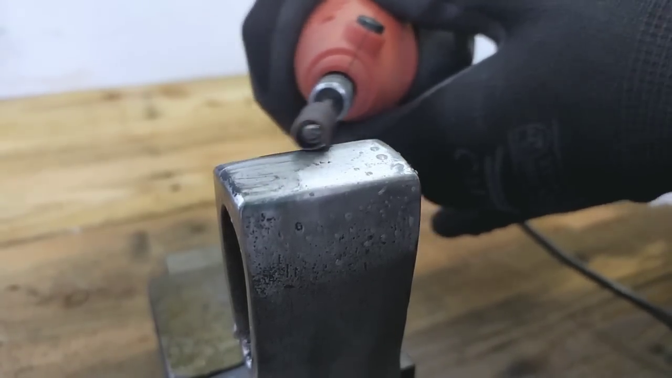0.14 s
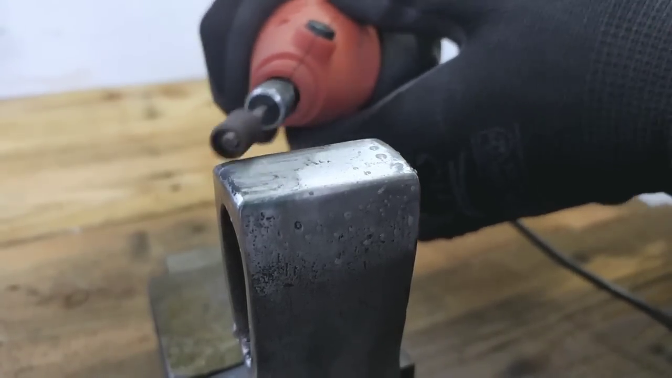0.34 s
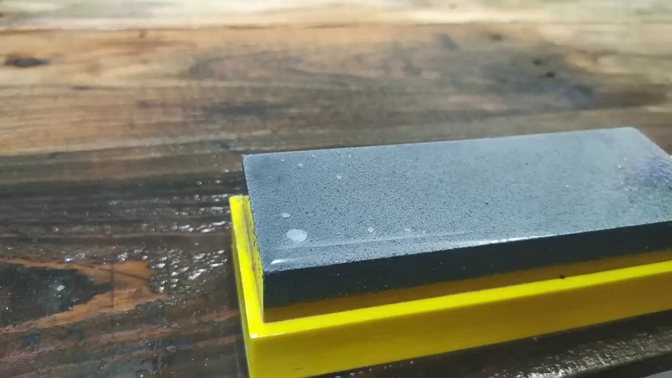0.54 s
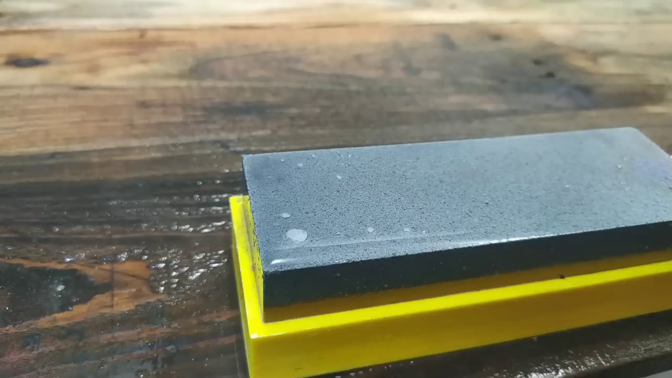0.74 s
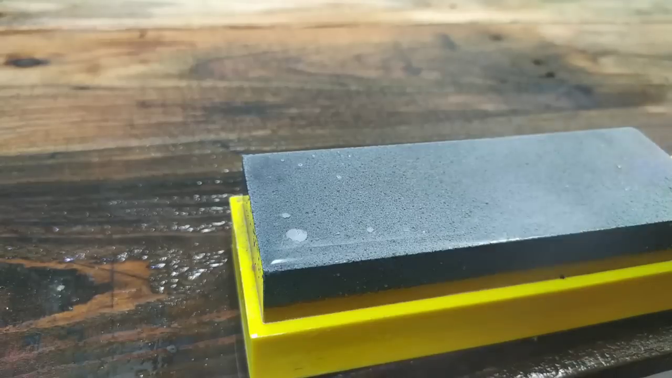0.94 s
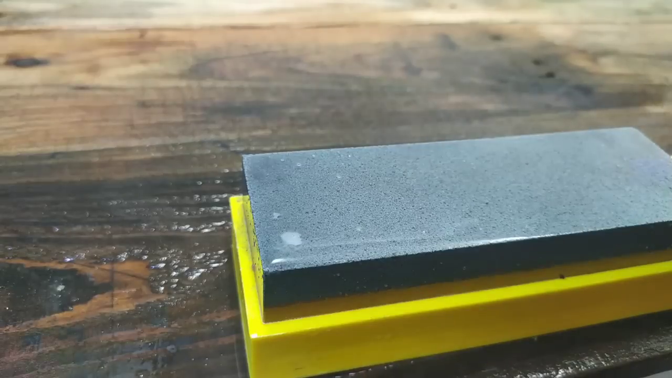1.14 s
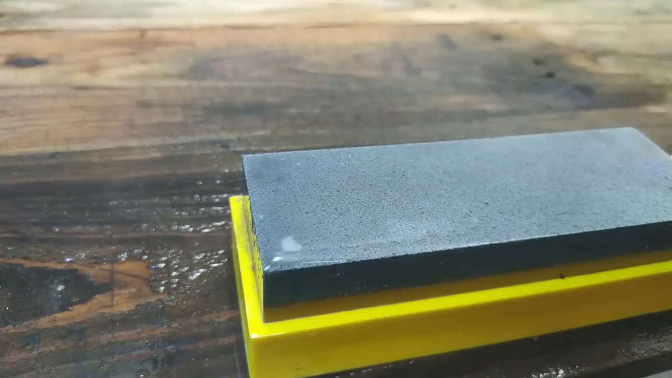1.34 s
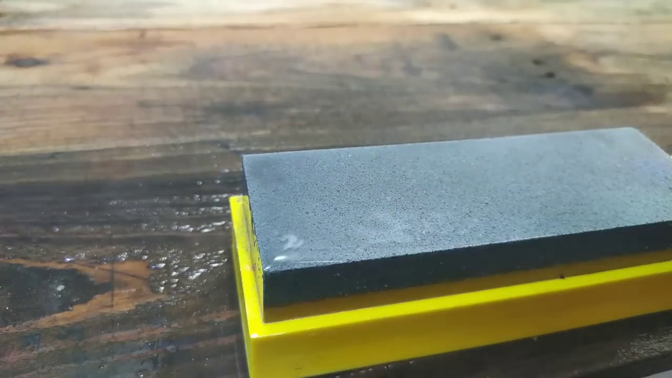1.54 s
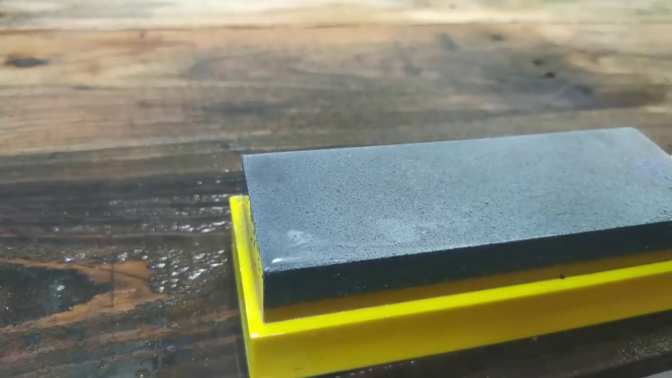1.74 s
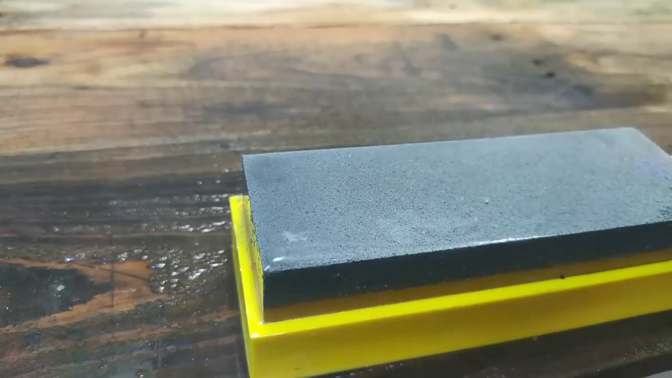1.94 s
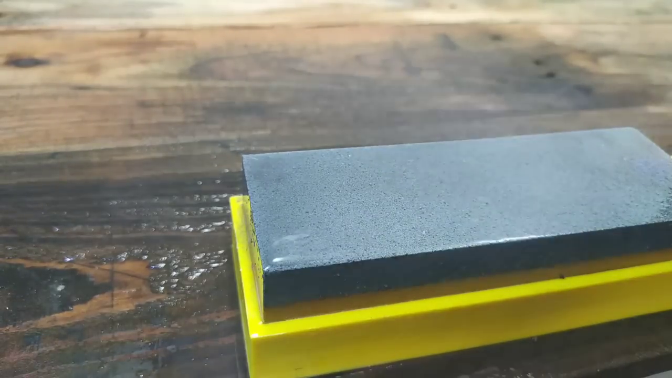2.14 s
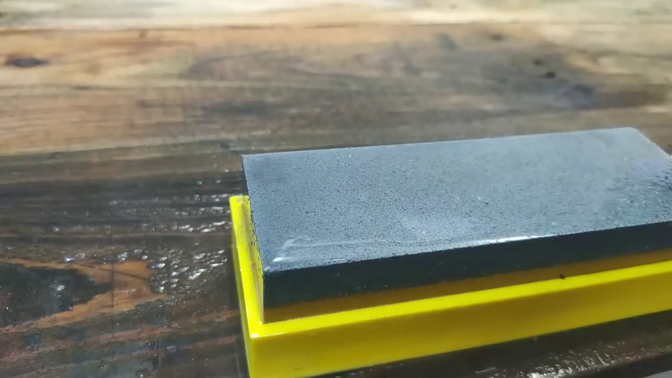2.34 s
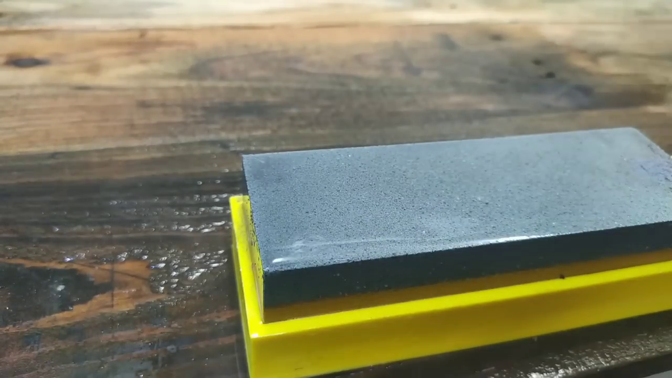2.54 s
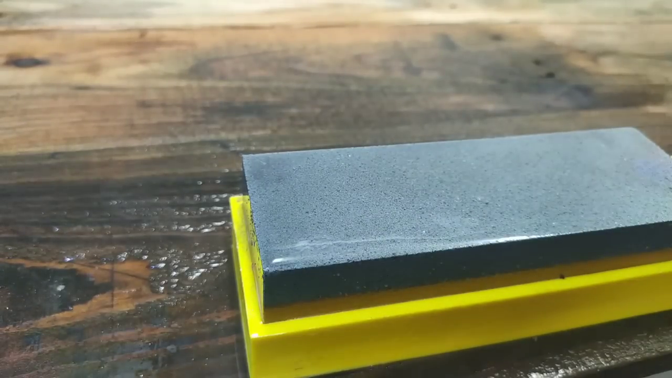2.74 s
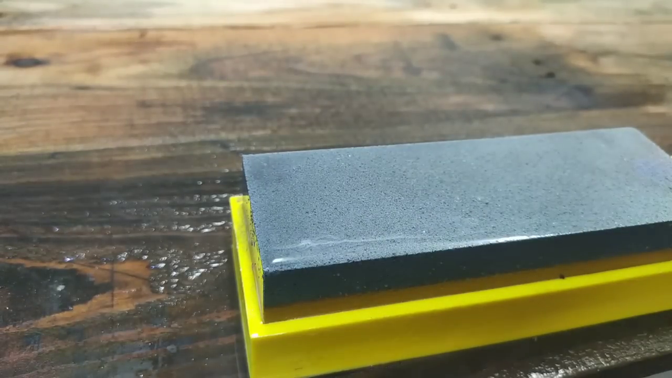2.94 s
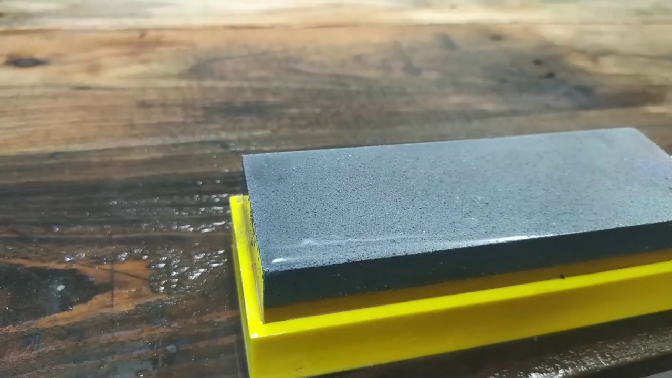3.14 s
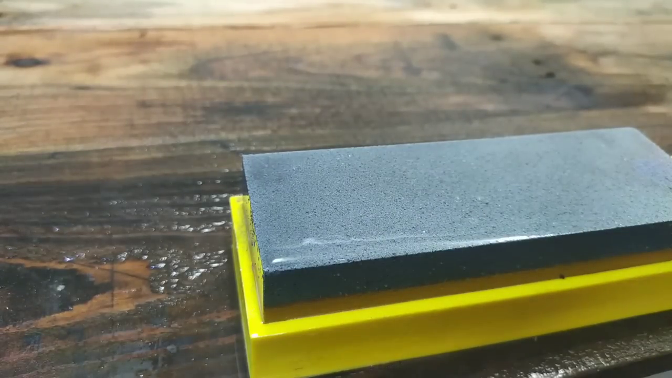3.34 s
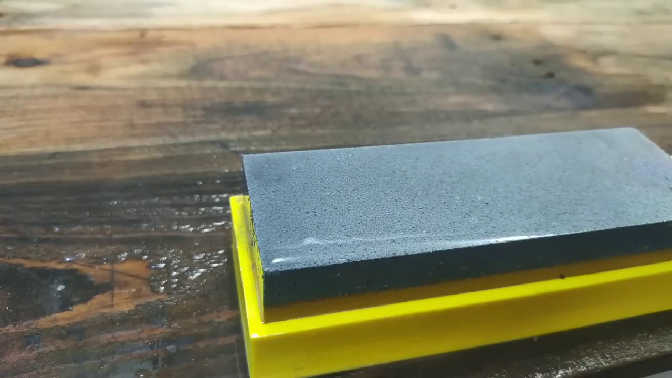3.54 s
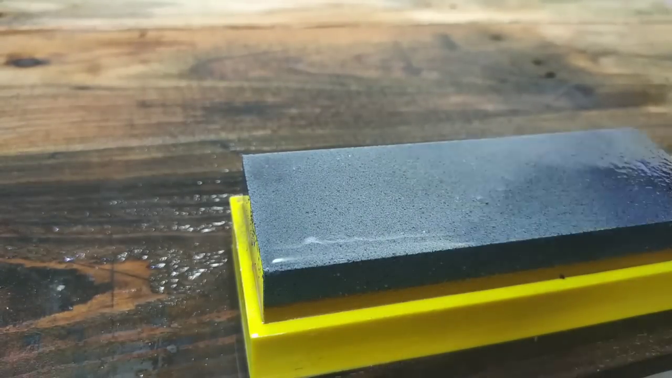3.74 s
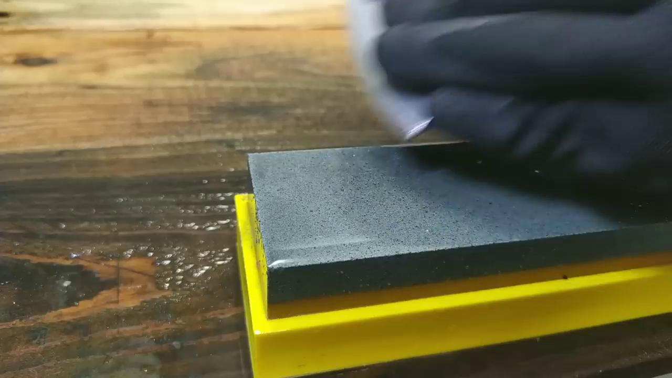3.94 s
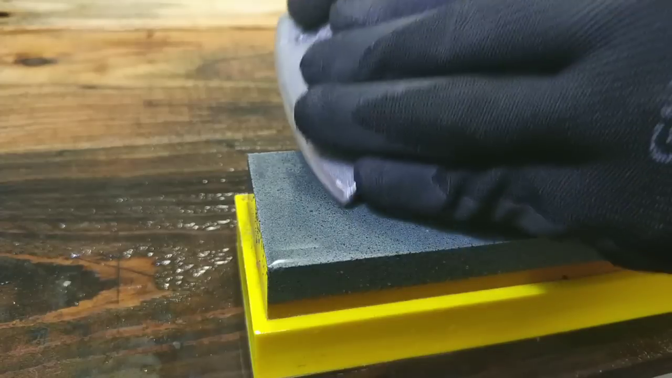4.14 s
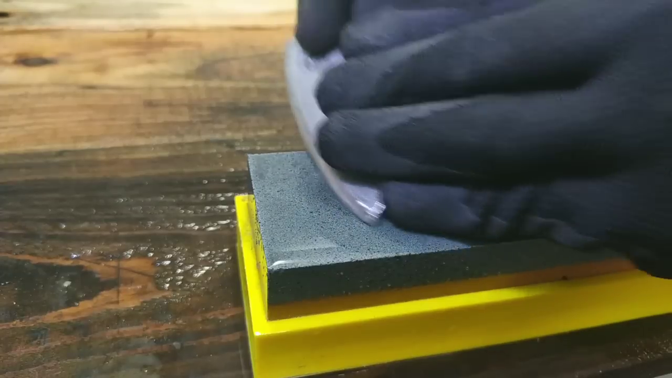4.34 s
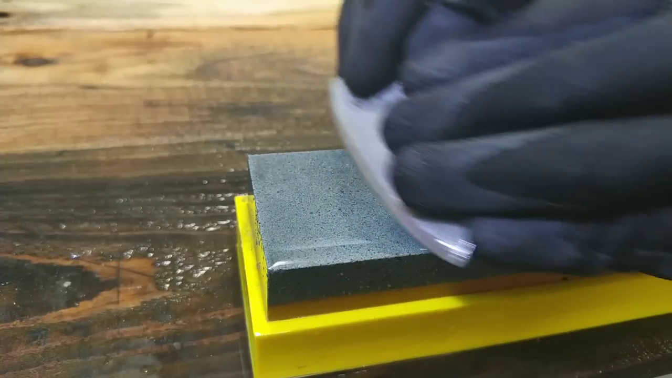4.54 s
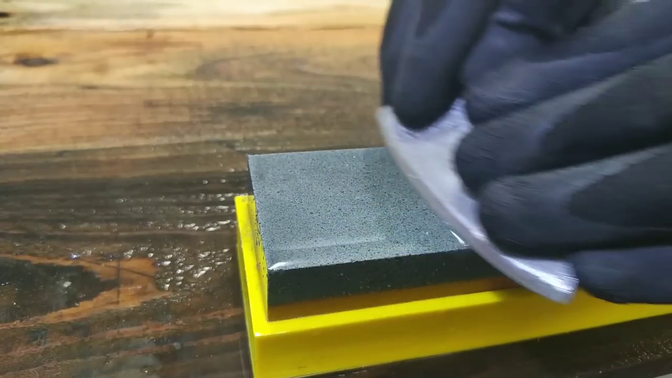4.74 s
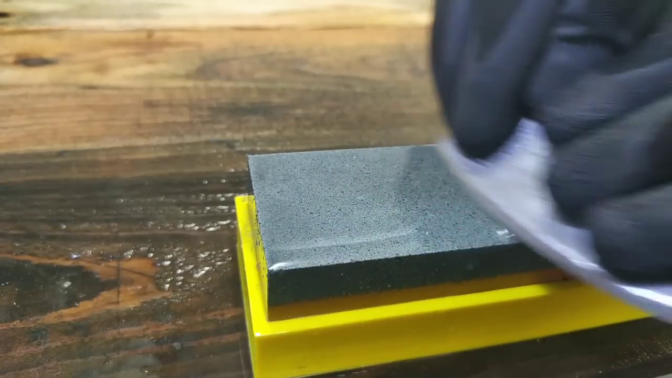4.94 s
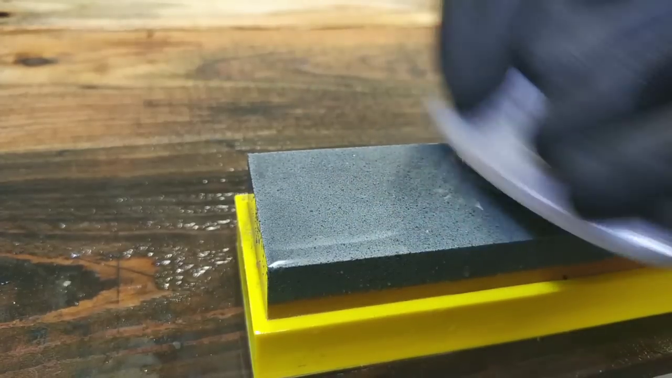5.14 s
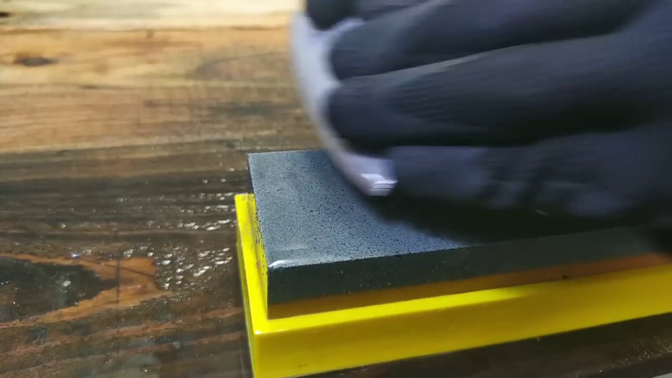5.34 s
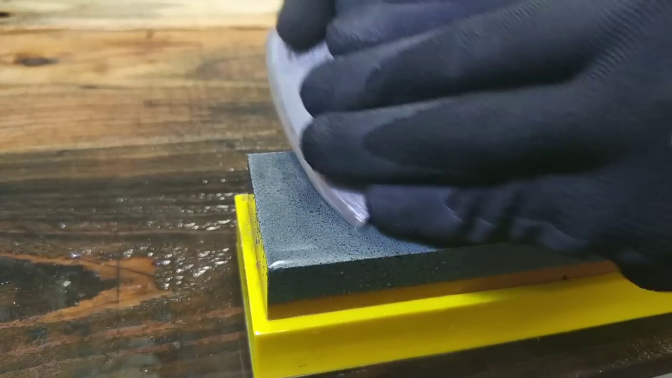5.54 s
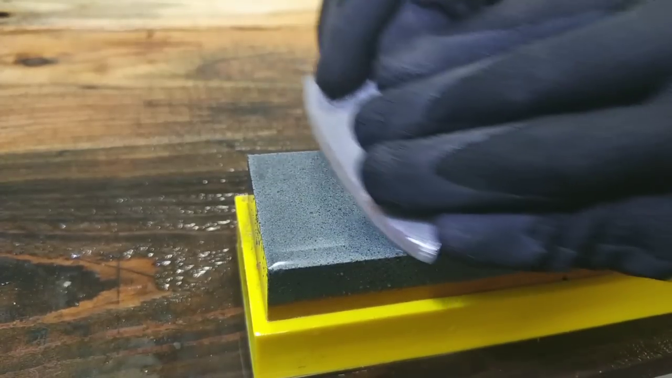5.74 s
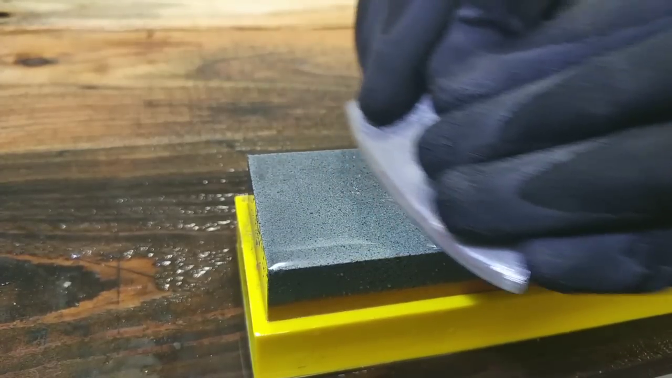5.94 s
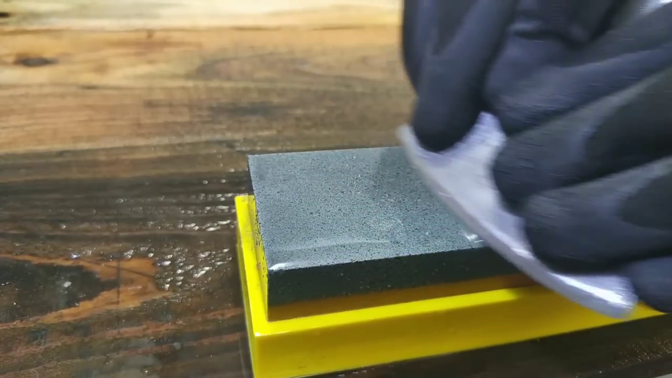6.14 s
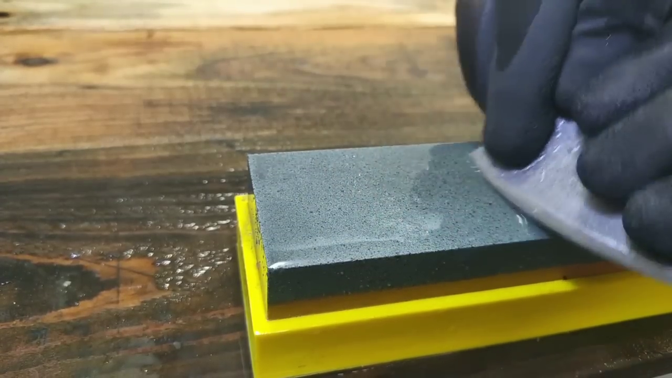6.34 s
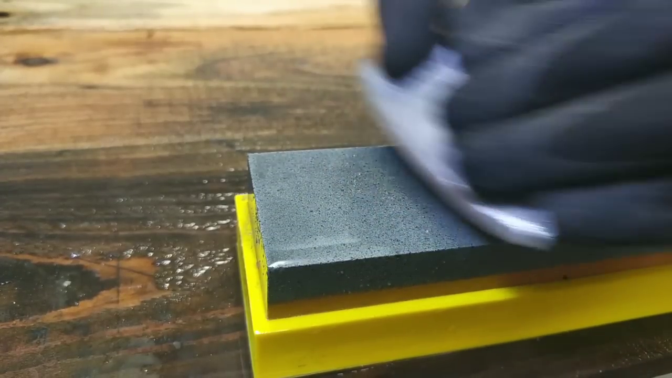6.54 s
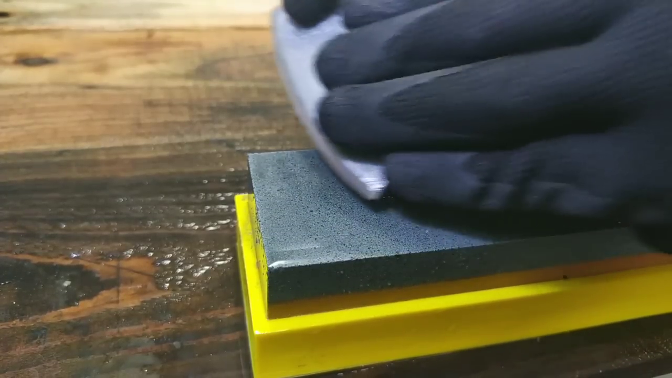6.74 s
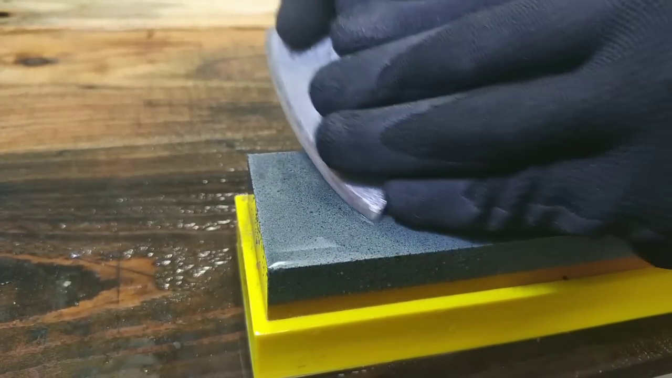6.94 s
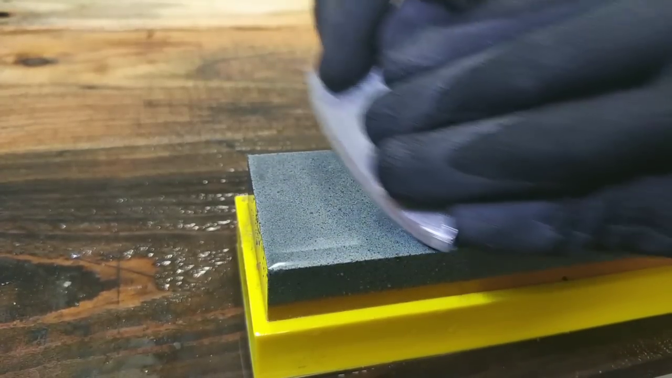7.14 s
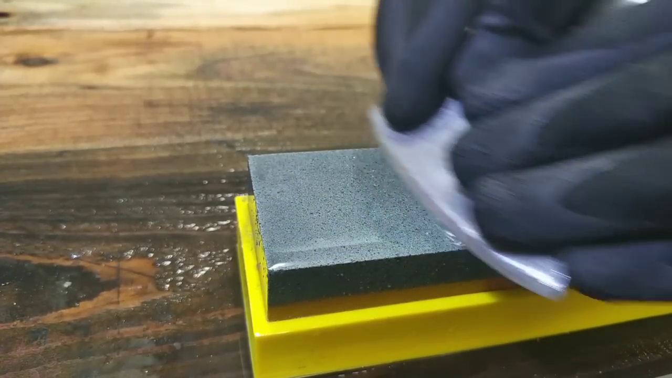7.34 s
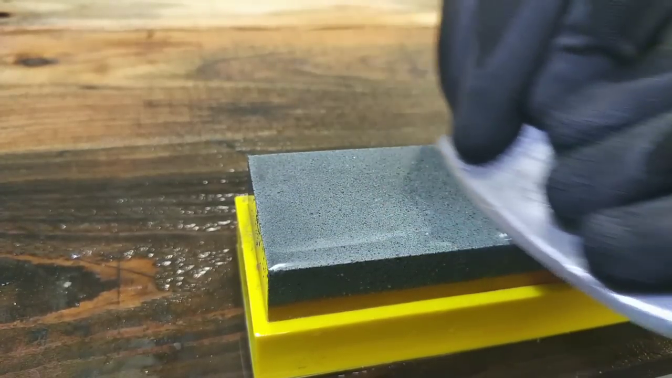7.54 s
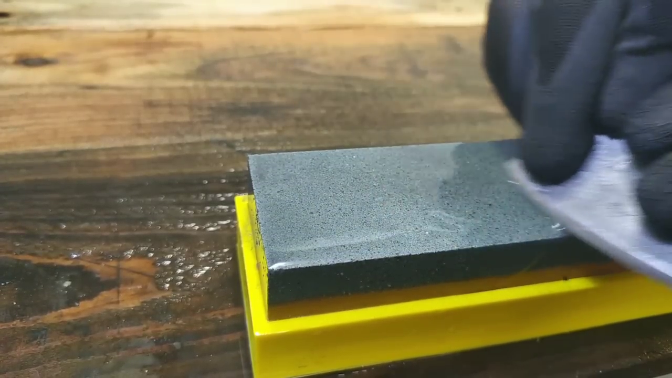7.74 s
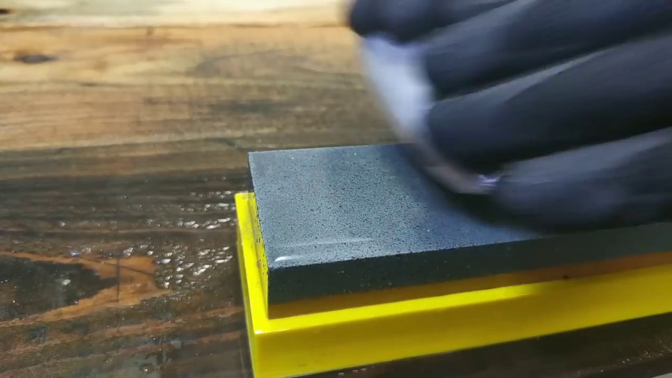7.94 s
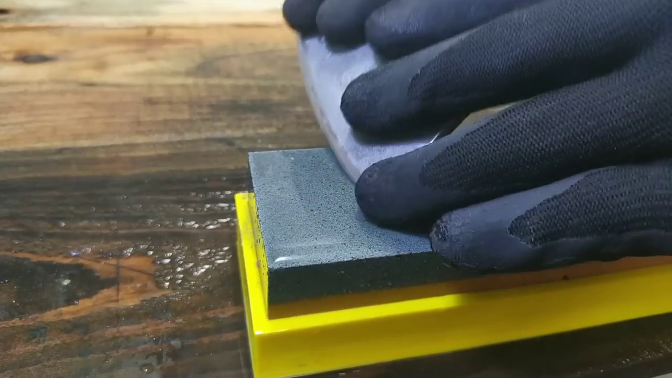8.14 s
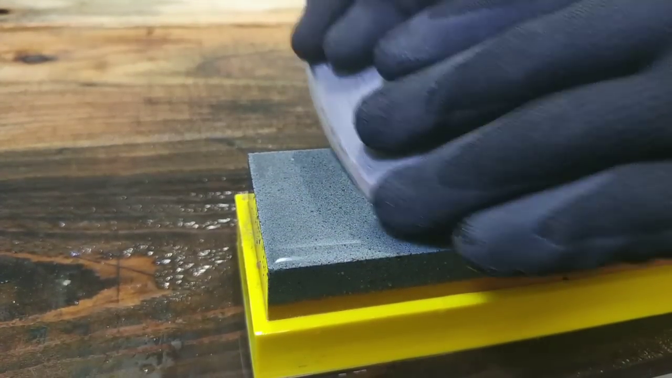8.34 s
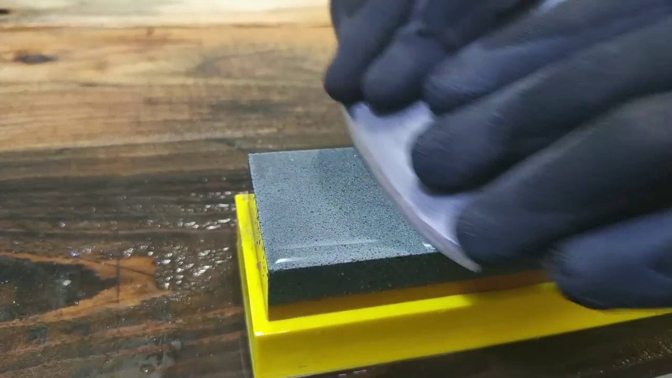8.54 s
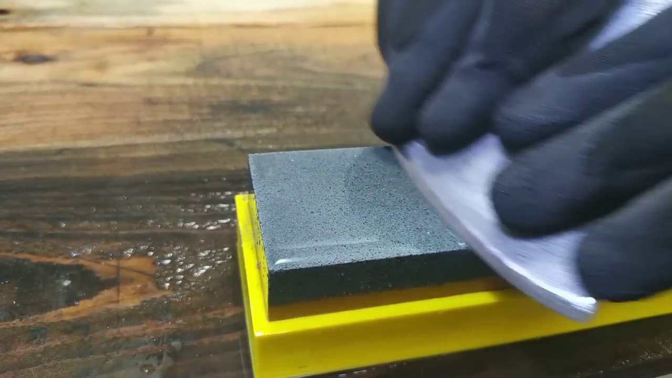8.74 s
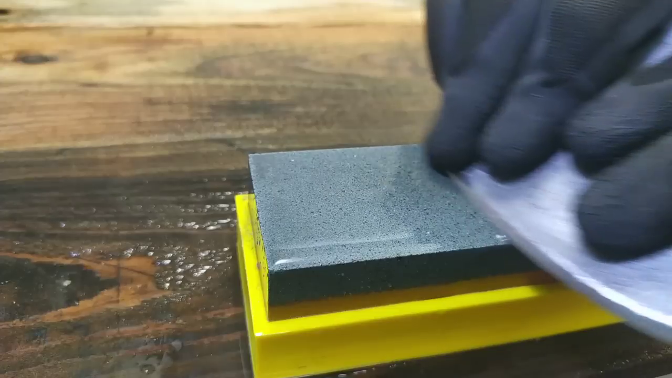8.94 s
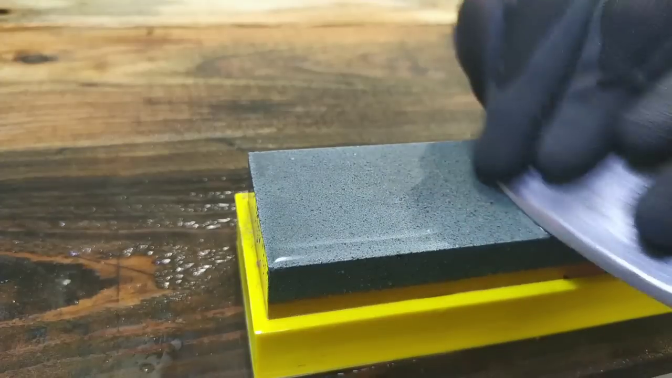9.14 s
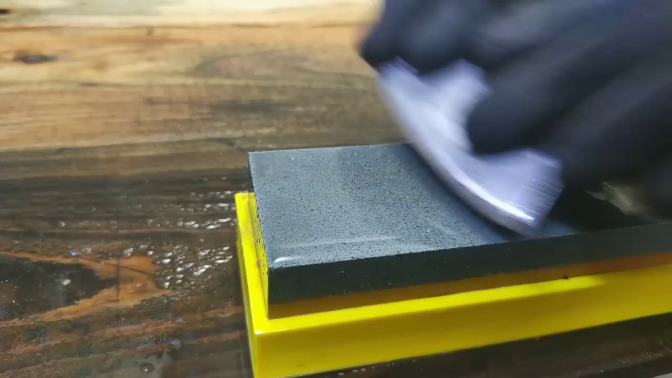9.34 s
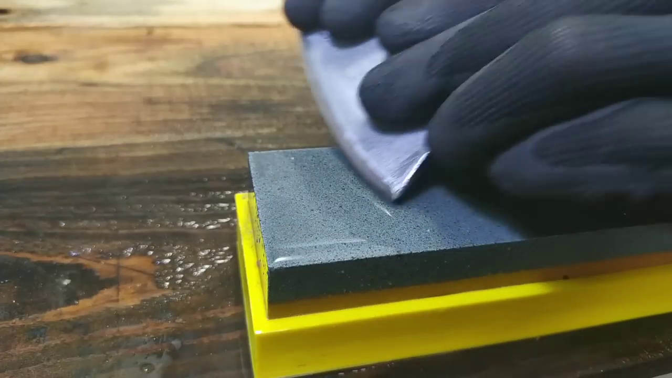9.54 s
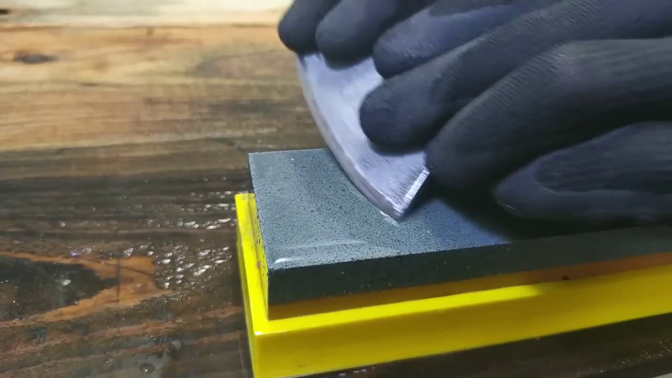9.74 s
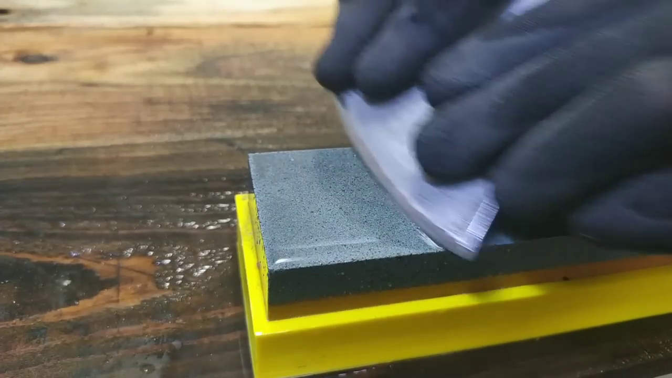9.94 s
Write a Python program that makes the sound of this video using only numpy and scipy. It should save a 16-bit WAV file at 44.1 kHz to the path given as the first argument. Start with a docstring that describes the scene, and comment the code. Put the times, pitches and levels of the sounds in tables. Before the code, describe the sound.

Close microphone, short room reverberation, soft background rumble. First a loud electric grinder buzzes against metal, sagging slightly in pitch, then fades quickly. Six crackling squirts of water follow in quick rhythm, each a hissing jet with rapid spits and a hollow plastic thump. Near silence follows, then a short metallic clack and slow abrasive strokes of blade on wet stone, their thin metallic tones gliding, the last cut short.

```python
"""Workshop, over a steady rumble, hiss and faint whine of filtered noise.
A rotary tool grinds a steel axe head and fades: shaft orders plus pulsed noise, in wide stereo; the rest is mono.
A trigger bottle sprays a whetstone six times: noise jet, pairs of valve spits, bottle thumps; ticks from the fade on.
The axe edge then lands on or snags the stone, ringing head and bench, and is drawn along it five times:
noise through modes that glide with the point of contact."""
import sys
import numpy as np
from scipy import signal
from scipy.fft import rfft, irfft, next_fast_len
from scipy.io import wavfile
from scipy.ndimage import uniform_filter1d, map_coordinates

SR = 44100
rng = np.random.default_rng(int(sys.argv[2]) if len(sys.argv) > 2 else 0)


def digitize_waveform(pressure):
    """Quantize a signal to 16-bit integers and store it at the path in sys.argv[1].

    Rows of a 2-D input are taken as channels; values are limited to [-1, 1].
    """
    field = np.atleast_2d(pressure).T
    bounded = np.clip(field, -1, 1)
    quanta = np.round(bounded * 32767).astype(np.int16)
    wavfile.write(sys.argv[1], SR, quanta)


N = 440118
T = np.arange(N) / SR
TOP_HZ = 15600

# background: (time [s], rumble [dB], hiss [dB])
ROOM_LEVELS = [(0, -56, -60), (.7, -59.5, -56.5), (.9, -58.5, -64.5), (2.4, -57.5, -63), (4.05, -58, -64.5),
               (4.11, -62, -66), (4.16, -59, -61), (9.98, -55.5, -66)]
# noise colours: (frequency [Hz], relative density [dB])
RUMBLE_SPECTRUM = [(15, -73.5), (25, -38.5), (39, -20.5), (52, -2), (69, 0.5), (125, -6), (161, -6.5),
                   (203, -9), (574, -15.5), (713, -17.5), (1120, -22), (1650, -41), (1970, -32.5),
                   (2700, -62), (3510, -84), (5940, -120)]
HISS_SPECTRUM = [(1590, -31.5), (2700, -27.5), (3560, -39.5), (3860, -4), (4340, -45), (5060, -10),
                 (5530, -7), (7460, 1.5), (8200, -1), (9020, -29), (13400, -33), (15500, -44.5)]
# faint electric whine: (centre [Hz], width of one filter pass [Hz], level [dB])
FAINT_WHINE = [(1946, 45, -71.5), (2337, 51, -88.5), (5130, 58, -79)]

# grinding: (time [s], level [dB], treble gain [dB])
TOOL_LEVELS = [(0.0, -31.5, 4.5), (0.152, -33, 6), (0.354, -27.5, 8), (0.508, -35, 6), (0.562, -32, 8.5),
               (0.61, -34.5, 9), (0.696, -50.5, 6.5), (0.705, -56, -0.5)]
# shaft speed, sagging under load: (time [s], speed [turns/s])
SHAFT_SPEED = [(0, 257.6), (.18, 257.8), (.28, 254.8), (.42, 248.2), (.46, 249.5), (.58, 257.4),
               (.7, 258.6)]
# grinding noise colour: (frequency [Hz], relative density [dB])
GRIND_SPECTRUM = [(18, -38), (30, -22), (59, 2), (173, -17.5), (249, -11), (432, -22), (505, -17),
                  (591, -10), (747, -9.5), (1170, -11), (1290, -2.5), (2300, -1), (3590, -14), (6720, -2),
                  (15500, -22.5)]
# shaft order envelope: (frequency [Hz], relative level [dB])
ORDER_ENVELOPE = [(140, -42), (240, -18), (434, -15), (759, -16), (1150, 3), (1280, -6.5), (2280, -10.5),
                  (3580, -7.5), (6710, -1.5), (15500, -13.5)]
# prominent orders: (shaft order [-], gain over envelope [dB])
STRONG_ORDERS = [(3, 6.5), (4, -7), (6, 5), (8, 5.5), (9, 10), (26, 5), (28, 8), (30, 5), (33, 6),
                 (34, 0.5)]
# stereo image of the grinding noise: (frequency [Hz], left-right correlation [-])
STEREO_LIKENESS = [(60, 0.98), (180, 0.51), (550, 0.35), (1650, -0.45), (4970, 0.17), (15000, -0.13)]

# dry clicks: (time [s], peak [dB], centre [Hz], width of one filter pass [Hz], burst t60 [s])
TICKS = [(.7165, -34, 6860, 6000, 0.0074), (1.1323, -37, 1300, 1100, 0.0071),
         (1.2174, -36.5, 6500, 5800, .004), (1.2274, -37, 8000, 7000, 0.0055),
         (2.1083, -32, 7670, 7040, .005), (2.2665, -30, 7400, 8000, .01), (2.348, -36, 2480, 5000, 0.004),
         (2.419, -39, 4940, 14000, 0.005), (2.807, -38, 6850, 5000, 0.01), (3.5023, -33, 6800, 4400, 0.01),
         (3.552, -43.5, 7000, 4000, 0.007), (9.726, -36.5, 9000, 8000, .008),
         (9.877, -28.5, 7000, 5930, 0.0067)]
# thin rings after some ticks: (time [s], level [dB])
PINGS = [(2.42, -74), (2.807, -63.5), (3.502, -68)]
PING_HZ, PING_WIDTH_HZ, PING_T60_S = 9500, 140, 0.28  # width of one filter pass

# trigger pulls: (nominal first spit [s], nominal last spit [s], spits [-], slow start [ms], slow ends [ms],
#   relative spit level [dB], relative fore-spit level [dB], nominal fore-spit lead [ms],
#   relative bottle thump [dB], jet opens [s], opening time [s], leak before [dB], jet at start [dB],
#   jet under spits [dB], shutting time [s], mist after [dB])
TRIGGER_PULLS = [(1.0432, 1.0646, 5, 0, 0, -10.5, -2, 2.5, -28.5, 1.021, .02, -60, -33, -28, .03, -60),
                 (1.2495, 1.3092, 8, .5, 0, -7, -2, 2.5, 2.5, 1.245, .004, -53.5, -31, -31, .012, -66),
                 (1.4706, 1.5546, 9, 0, .8, -5.5, -1.5, 2.4, .6, 1.462, .022, -59, -27, -37, .012, -69),
                 (1.6967, 1.7713, 8, 1.7, 1.9, -6.5, -2, 3, -1.5, 1.679, .005, -48, -30, -38, .012, -58),
                 (1.9036, 1.9835, 9, 3.7, 2.2, -6.5, -5, 2.7, .1, 1.889, .005, -48, -29, -38, .012, -67),
                 (2.1304, 2.2079, 8, 1.8, 1.9, -6.5, -5, 2.8, -3, 2.115, .007, -54, -29, -39, .012, -56)]
# nozzle noise colour: (frequency [Hz], relative density [dB])
NOZZLE_SPECTRUM = [(410, -34), (700, -50), (1160, -14.5), (1430, -15), (2000, -8), (3320, -9.5),
                   (3580, -5.5), (4890, -6), (5860, 2.5), (8110, 1), (12400, -6.5), (14200, -14.5),
                   (15500, -69.5)]
# nozzle cavity, ringing after each spit: (centre [Hz], width [Hz], level [dB])
NOZZLE_CAVITY = [(7600, 1100, 0)]
# bottle shell: (centre [Hz], width [Hz], relative level [dB])
BOTTLE_MODES = [(227, 18, 6), (439.4, 26, 0), (613, 52, -11), (1109, 100, -7)]
# trigger springing back: (time [s], click level [dB])
TRIGGER_RETURNS = [(1.1734, -24.5), (1.4008, -27.5), (1.6147, -27.5), (1.8233, -30.5), (2.0388, -28.5),
                   (2.2568, -33.5)]
# mist after the last pull: (time [s], level [dB])
MIST_FADES = [(2.3, -56), (2.45, -68), (2.6, -100)]
CHATTER_DROP_S = .006  # the jet chokes this soon after the first spit
JET_HOLD_S, SHUT_DB, MIST_S = .003, -26, 0.068  # after the last spit: hold, fast drop, then down to the mist
SIP_S, SIP_HISS_DB = 0.029, -12  # air sucked in around the click: length, level under the click

# edge lands on or snags the stone: (time [s], ring peak [dB], knock over ring [dB], contact t60 [s])
LANDINGS = [(4.232, -17.5, -5, 0.12), (5.5669, -19, -4, 0.11), (6.889, -25, 0.5, 0.066),
            (7.8534, -28, -19, 0.17), (8.2077, -25, -1, 0.14), (9.6619, -24.5, -1, 0.11)]
# free axe head: (frequency [Hz], mean relative level [dB], t60 before the grip limit [s])
AXE_MODES = [(1420, -8, 0.26), (2016, -17, 0.17), (2848, -6, 0.16), (3560, -9.5, 0.27), (5300, -11, 2.4),
             (5730, -9, 0.044), (5920, -36, 0.2), (6530, 12.5, 0.018), (8000, -1, 0.4), (8882, -49, 5.0),
             (9400, -2.5, 0.31), (11330, -13.5, 0.079)]
GRIP_T60_S = 0.052  # the gloved grip lets no mode ring longer
# stone and bench: (centre [Hz], width [Hz], relative level [dB])
BENCH_MODES = [(294, 56, 6), (463, 83, 14.5), (670, 102, 10.5), (885, 56, 9.5), (1480, 290, -6)]
# grit on the edge: (frequency [Hz], relative density [dB])
RASP_SPECTRUM = [(59, -36), (100, -2), (756, -2.5), (1270, -2), (1730, -15), (1980, -15), (2100, -31),
                 (2800, -24.5), (3030, -55), (3330, -19), (3740, -13), (4800, -14.5), (5400, -3.5),
                 (6670, -7.5), (10000, -18.5), (13000, -86), (22000, -120)]

# one list per stroke: (time [s], contact place along edge [0-1], rasp [dB], blade mode gain [dB],
#   heel mode gain [dB])
STROKES = [
    [(4.27, 0, -59, 12, 3), (4.33, 0.07, -54, -2, -3), (4.5, 0.23, -51.5, 6.5, 1.5),
     (4.75, 0.52, -53, 1, -3), (4.93, 0.71, -50.5, 3, 4), (5.0, .83, -47.5, 1.5, 9.5),
     (5.12, 0.95, -50.5, 4.5, -12), (5.16, 0.99, -66, 3, 1), (5.24, .97, -73, 2, 2)],
    [(5.61, 0, -50, 9, -1), (5.66, 0.08, -51.5, -1, 0), (5.8, 0.29, -57, 4.5, 2),
     (5.97, 0.51, -55, 3.5, -1), (6.2, 0.75, -52.5, 1.5, -5), (6.32, .86, -48.5, 5, 2),
     (6.44, 1, -51.5, 5, -4), (6.465, 0.94, -68, -3, -4), (6.54, .97, -70, -1, -1)],
    [(6.92, 0, -53, 7, 5), (6.98, 0.09, -58.5, -3, 2), (7.2, 0.25, -52.5, 1.5, 0),
     (7.4, 0.55, -55.5, 3.5, 2), (7.62, 0.75, -51.5, -6, -3.5), (7.72, 0.87, -51, 1.5, -1),
     (7.82, 0.94, -53, 6.5, 1), (7.87, 1, -47, 14, 4), (7.9, 1, -65.5, -17, 11), (7.97, 0.99, -65, -1, -1)],
    [(8.24, 0.14, -65, 8, 6), (8.33, 0.07, -61.5, -11, -5), (8.5, .24, -54, -1.5, 2.5),
     (8.63, 0.32, -53, 4, 2), (8.74, .5, -50, 3, -4), (8.88, .66, -55.5, -2, -1), (9.08, 0.82, -54, -14, 0),
     (9.19, 0.92, -66, 0, 5), (9.21, 0.98, -58, 4, 7.5), (9.3, .97, -85, -1, -4)],
    [(9.7, 0.15, -59, 1, 8), (9.77, 0.08, -65, -3, -3), (9.84, 0.22, -62, 4, -11), (9.92, 0.15, -55, 0, -8),
     (9.98, 0.27, -53, 8, 5)],
]
# steady modes of bench and blade: (centre [Hz], width [Hz], relative level [dB])
HELD_MODES = [(123, 57, -4.5), (172, 24, -32.5), (9040, 83, -9)]
# gliding modes, alike in every stroke: (contact place [0-1], centre [Hz], level over rasp [dB])
STONE_MODE = [(0, 1020, -34), (.15, 1330, -3), (.3, 1276, 1), (.5, 1285, 3), (.8, 1250, -1),
              (.93, 1114, -6), (1, 880, -1.5)]
LOW_MODE = [(0, 2900, -9), (.2, 3057, -7.5), (.5, 3326, -2.5), (.65, 3085, -7.5), (.85, 2900, -14),
            (1, 2860, -12)]
BLADE_MODE = [(0, 6540, -2), (.2, 6740, 0), (.45, 6710, -2), (.55, 7060, -2), (.7, 6650, 0), (.8, 6650, 0),
              (.92, 6910, 0.5), (1, 6670, -9)]
# families of gliding modes, one list per mode: (contact place [0-1], centre [Hz], level over rasp [dB])
SLIDING_MODES = [
    [(0, 5300, -7), (.17, 5660, -6), (.27, 5400, -20)],
    [(.24, 5180, -13), (.32, 5280, 0), (.45, 5820, 3), (.55, 6130, 1), (.68, 5760, -8), (.78, 5700, -26)],
    [(.74, 5100, -16), (.8, 5360, -13), (.87, 5570, 3), (.94, 6000, -10.5), (1, 5560, -2.5)],
]
HEEL_MODES = [
    [(0, 3750, -17), (.12, 3840, -16.5), (.22, 4140, -6), (.33, 3890, -9), (.45, 3480, -9)],
    [(.1, 4500, -20), (.22, 4440, -7.5), (.4, 4640, -17)],
    [(.58, 3510, -9), (.68, 3985, -5.5), (.84, 4320, 0), (.94, 4250, -3.5), (1, 3530, -3)],
    [(.68, 4400, -10), (.8, 4850, -15.5), (1, 4500, -10)],
]
CHEEK_MODES = [
    [(.25, 7300, -9), (.42, 7160, -9), (.53, 7700, -6), (.62, 7800, 1)],
    [(0, 8100, -20), (.12, 8180, -4), (.3, 8500, -0.5), (.42, 8080, -6), (.55, 8400, -5), (.63, 8180, -4.5),
     (.85, 8500, -5), (1, 8380, -9)],
]
EDGE_MODES = [
    [(0, 9500, -34), (.15, 9500, -7), (.26, 9370, -5), (.34, 10230, -10), (.52, 9540, -13)],
    [(.52, 9400, -12), (.68, 10550, -5.5), (.78, 10160, -8.5), (.86, 9400, -7), (1, 9500, -9.5)],
]
FINE_MODES = [
    [(.2, 11200, -31), (.33, 11000, -17), (.55, 11000, -32), (.65, 11500, -17), (.75, 11100, -10.5),
     (1, 11640, -15)],
    [(.05, 13000, -42), (.24, 13200, -17), (.45, 12750, -26), (.57, 12600, -29), (.77, 12830, -11),
     (1, 12750, -24)],
]
STONE_WIDTH_HZ, LOW_WIDTH_HZ, HEEL_WIDTH_HZ, SLIDING_WIDTH_HZ = 170, 170, 215, 225
BLADE_WIDTH_HZ, EDGE_WIDTH_HZ, CHEEK_WIDTH_HZ, FINE_WIDTH_HZ = 150, 560, 270, 320
FLUTTER_DB, FLUTTER_PER_S = 2.5, 22  # each gliding mode comes and goes on its own: scale, knots per second


def amp(db):
    """Amplitude of a level in dB."""
    return 10 ** (np.asarray(db) / 20)


def unit(x):
    """x scaled to rms 1."""
    return x / np.sqrt(np.mean(x ** 2) + 1e-20)


def along(points, hz):
    """Interpolates (Hz, value) points on a log axis."""
    f, v = np.transpose(points)
    return np.interp(np.log(hz + 1), np.log(f + 1), v)


def curves(rows, x=T):
    """Interpolates each column over the first."""
    knots, *cols = np.transpose(rows)
    return [np.interp(x, knots, c) for c in cols]


def gate(rows, t=T):
    """1 inside a table's time span, with short fades."""
    return np.clip(np.minimum(t - rows[0][0], rows[-1][0] - t) / 0.0089, 0, 1)


def wobble(rate, size=N):
    """Smooth random curve, rate knots per second."""
    knots = rng.standard_normal(int(size * rate / SR) + 4)
    return map_coordinates(knots, [np.arange(size) * rate / SR])


def filtered(x, response):
    """x through a complex frequency response."""
    m = next_fast_len(x.shape[-1] + 8192)
    spectrum = rfft(x, m) * response(np.fft.rfftfreq(m, 1 / SR))
    return irfft(spectrum, m)[..., :x.shape[-1]]


def noise(spectrum):
    """Coloured noise of rms 1."""
    return unit(filtered(rng.standard_normal(N), lambda hz: amp(along(spectrum, hz))))


def resonances(modes):
    """Causal response of (Hz, width Hz, dB) modes, alternating in sign."""
    def response(f):
        return sum((-1) ** k * amp(db) * 1j * f * w / (c * c - f * f + 1j * f * w)
                   for k, (c, w, db) in enumerate(modes))
    return response


def add(track, s, sound):
    """Mixes a sound into a track at time s."""
    part = track[round(s * SR):][:len(sound)]
    part += sound[:len(part)]


def patches(shape, depth_db):
    """Random gain field over frequency and time."""
    field = uniform_filter1d(rng.standard_normal(shape), 5, 0)
    return amp(depth_db * unit(uniform_filter1d(field, 24, 1)))


def workshop():
    """Room rumble, patchy hiss and a thin electric whine, all filtered noise."""
    rumble_db, hiss_db = curves(ROOM_LEVELS)
    whine = np.zeros(N)
    for hz, width_hz, db in FAINT_WHINE:
        tone = filtered(rng.standard_normal(N), lambda f: resonances([(hz, width_hz, 0)])(f) ** 2)
        whine += unit(tone) * amp(db + 3.1 * wobble(8.9))
    z = signal.stft(noise(HISS_SPECTRUM), nperseg=512)[2]
    hiss = unit(signal.istft(z * patches(z.shape, depth_db=3.0), nperseg=512)[1][:N])
    rumble = amp(rumble_db + 0.29 * wobble(6.5)) * noise(RUMBLE_SPECTRUM)
    return rumble + amp(hiss_db) * hiss + whine


def rotary_tool():
    """Shaft orders that sag under load over grinding noise, pulsed once a turn."""
    n = round(TOOL_LEVELS[-1][0] * SR)
    shaft_hz, = curves(SHAFT_SPEED, T[:n])
    db, treble_db = curves(TOOL_LEVELS, T[:n])
    turn = 2 * np.pi * np.cumsum(shaft_hz) / SR
    tones = np.zeros((2, n))
    for k in range(1, 62):
        level_db = along(ORDER_ENVELOPE, k * shaft_hz.mean()) + dict(STRONG_ORDERS).get(k, 0)
        # uneven contact roughens every order
        shake = amp(level_db + 4 * wobble(60, size=n) + 1.3 * wobble(10, size=n))
        phase = k * turn + rng.uniform(0, 2 * np.pi) + (.45 + k / 70) * wobble(70, size=n)
        apart = min(k / 6, 1)  # short waves reach the two sides by different paths off the bench
        for side_tones in tones:
            drift = amp(2.1 * apart * wobble(12.0, size=n))
            side_tones += shake * drift * np.sin(phase + apart * rng.uniform(0, 2 * np.pi))

    def mid_side(hz):
        """Coloured mid and side gains that give the tabled left-right correlation."""
        angle = np.arccos(np.clip(along(STEREO_LIKENESS, hz), -1, 1)) / 2
        return amp(along(GRIND_SPECTRUM, hz)) * [np.cos(angle), np.sin(angle)]

    grit = (1 + .4 * np.cos(turn)) * amp(2.5 * wobble(900, size=n)) * rng.standard_normal((2, n))
    mid, side = filtered(grit, mid_side)
    sound = unit(unit(tones) + .5 * unit(np.array([mid + side, mid - side])))
    treble = filtered(sound, lambda hz: 1 / (1 + (9500 / (hz + 1)) ** 8))
    sound = amp(db) * (sound - treble + amp(treble_db) * treble)
    return np.pad(sound, ((0, 0), (0, N - n)))


def ticks():
    """Small dry clicks, each a short broad noise burst; some carry a thin ring."""
    track, t = np.zeros(N), T[:2048]
    for s, db, hz, width_hz, t60_s in TICKS:
        burst = amp(-60 * t / t60_s) * rng.standard_normal(len(t))
        click = filtered(burst, lambda f: resonances([(hz, width_hz, 0)])(f) ** 4)
        add(track, s, amp(db) * click / np.abs(click).max())
    t = T[:SR // 4]
    ping_mode = resonances([(PING_HZ, PING_WIDTH_HZ, 0)])
    for s, db in PINGS:
        ring = filtered(rng.standard_normal(len(t)), lambda f: ping_mode(f) ** 2)
        add(track, s, amp(db - 60 * t / PING_T60_S) * unit(ring))
    return track


def jet_level():
    """Amplitude of the jet: each pull leaks, opens, chokes while the valve spits, shuts and leaves a mist."""
    rows = []
    for first, last, *_, opens, rise_s, leak_db, start_db, under_db, shut_s, mist_db in TRIGGER_PULLS:
        shut = last + JET_HOLD_S
        rows += [(opens - rise_s, leak_db), (opens, start_db), (first, start_db),
                 (first + CHATTER_DROP_S, under_db), (shut, under_db),
                 (shut + shut_s, under_db + SHUT_DB), (shut + shut_s + MIST_S, mist_db)]
    rows += MIST_FADES
    return gate(rows) * amp(curves(rows)[0])


def spray():
    """Sputtering noise jet; valve spits, in pairs, ring the nozzle cavity and thump the bottle shell."""
    jet = jet_level() * amp(2.5 * wobble(600) + 2.5 * wobble(130))
    sputter, spits, thumps, t = np.zeros(N), np.zeros(N), np.zeros(N), T[:SR // 100]
    wake = amp(-60 * t / .005) * (1 - np.exp(-t / .0003))  # turbulence behind the slug
    for first, last, count, start_ms, ends_ms, db, fore_db, lead_ms, bottle_db, *_ in TRIGGER_PULLS:
        progress = np.linspace(0, 1, round(count))
        delay_ms = start_ms * 4 * progress * (1 - progress) + ends_ms * np.sin(2 * np.pi * progress)
        times = first + (last - first) * progress + delay_ms / 1000 - .0002
        for s, late, (a, b, c) in zip(times, progress, rng.standard_normal((len(times), 3))):
            main_db = db - 4 * late ** 3
            fore_s = s - (lead_ms * (.9 + .5 * (2 * late - 1) ** 2) + .25 * c) / 1000
            # the first fore-spit of a pull is faint
            fore_spit_db = main_db + fore_db + 3 - 9 * late ** 2 - 20 * (late == 0) + 1.8 * b
            for at, level_db in ((s, main_db + 1.2 * a), (fore_s, fore_spit_db)):
                add(spits, at, amp([level_db + 7.5]))  # one-sample impulse
                add(sputter, at, amp(level_db - 4) * wake)
            add(thumps, s, amp([bottle_db + 4 * np.sin(np.pi * late) + 3.8 * a]))
    for s, db in TRIGGER_RETURNS:
        swell = np.hanning(round(SIP_S * SR)) ** 2
        sip = amp(db + SIP_HISS_DB) * swell * amp(3.47 * wobble(540, size=len(swell)))
        add(sputter, s + 0.0061 - len(swell) / SR / 2, sip)
        add(sputter, s, amp(db) * wake * (1 - np.exp(-t / .0015)))  # click

    cavity = resonances(NOZZLE_CAVITY)

    def spit_response(hz):
        return amp(along(NOZZLE_SPECTRUM, hz)) * (1 / 2 + 2 * cavity(hz))

    def shell(hz):
        return resonances(BOTTLE_MODES)(hz) / (1 + 170 / (1j * hz + 1)) ** 2

    sputter_sound = sputter * noise(NOZZLE_SPECTRUM)
    jet_sound = jet * unit(filtered(noise(NOZZLE_SPECTRUM), lambda hz: 1.4 + cavity(hz)))
    spit_sound = filtered(spits, spit_response)
    bottle_sound = filtered(thumps + amp(-5.0) * jet * rng.standard_normal(N), shell)
    return sputter_sound + jet_sound + spit_sound + bottle_sound


def landings():
    """Edge chatters on the stone: a noisy contact force rings the free axe head and knocks the bench."""
    track, t = np.zeros(N), T[:SR // 3]
    for s, db, knock_db, contact_s in LANDINGS:
        modes = np.zeros(len(t))
        for hz, level_db, t60_s in AXE_MODES:
            decay_db = level_db + rng.normal(0, 2.7) - 60 * t / min(t60_s, GRIP_T60_S)
            modes += amp(decay_db) * np.sin(2 * np.pi * hz * t)
        force = amp(-60 * t / contact_s) * rng.standard_normal(len(t)) * (1 - np.exp(-t / 0.00038))
        scrape = 0.26 * amp(-60 * t / 0.14) * rng.standard_normal(len(t))
        grit = 6 * filtered(force + scrape, lambda hz: amp(along(RASP_SPECTRUM, hz)))
        ring = signal.fftconvolve(force, modes)[:len(t)] + grit
        tail = 0.11 * amp(-60 * t / 0.57) * rng.standard_normal(len(t))  # the bench rumbles on
        knock = filtered(force + tail, resonances(BENCH_MODES))
        add(track, s, amp(db) * ring / np.abs(ring).max())
        add(track, s, amp(db + knock_db) * knock / np.abs(knock).max())
    return track


def strokes():
    """Grit excites the blade; its modes glide as the point of contact moves along the edge."""
    grit = rng.standard_normal(N) * amp(1.36 * wobble(30) + 0.36 * wobble(150))
    hz, t, z = signal.stft(unit(grit), SR, nperseg=512, noverlap=384)
    hz = hz[:, None]

    def hump(centre_hz, width_hz):
        """Power per Hz of one mode."""
        return 1 / (1 + (2 * (hz - centre_hz) / width_hz) ** 6) / width_hz

    def glide(modes, width_hz, place):
        """Power of a family of modes at each place; each is silent outside its stretch of the edge."""
        power = 0
        for mode in modes:
            centre_hz, level_db = curves(mode, place)
            flutter_db = FLUTTER_DB * wobble(FLUTTER_PER_S * 128, size=len(place))  # 128 samples a frame
            inside = (place >= mode[0][0]) * (place <= mode[-1][0])
            power = power + inside * amp(2 * (level_db + flutter_db)) * hump(centre_hz, width_hz)
        return power

    rasp = amp(2 * along(RASP_SPECTRUM, hz)) / 1500
    rasp = rasp + sum(amp(2 * db) * hump(c, w) for c, w, db in HELD_MODES)
    power = np.zeros(z.shape)
    for rows in STROKES:
        now = (t > rows[0][0]) & (t < rows[-1][0])
        place, db, blade_db, heel_db = curves(rows, t[now])
        place = np.clip(place, 0, 1)
        blade = glide([BLADE_MODE], BLADE_WIDTH_HZ, place) + glide(SLIDING_MODES, SLIDING_WIDTH_HZ, place)
        heel = glide(HEEL_MODES, HEEL_WIDTH_HZ, place)
        others = sum(glide(modes, width_hz, place) for modes, width_hz in (
            ([STONE_MODE], STONE_WIDTH_HZ), ([LOW_MODE], LOW_WIDTH_HZ), (CHEEK_MODES, CHEEK_WIDTH_HZ),
            (EDGE_MODES, EDGE_WIDTH_HZ), (FINE_MODES, FINE_WIDTH_HZ)))
        total = rasp + others + amp(2 * blade_db) * blade + amp(2 * heel_db) * heel
        power[:, now] = gate(rows, t[now]) * amp(2 * db) * total
    shaped = z * patches(z.shape, depth_db=3.0) * np.sqrt(power * SR / 2)
    return signal.istft(shaped, SR, nperseg=512, noverlap=384)[1][:N]


def walls(x):
    """The room's answer: a decaying noise tail."""
    t = T[:SR // 2]
    tail = amp(-60 * t / 0.2) * rng.standard_normal(len(t)) * (t > .006)
    return signal.fftconvolve(x, tail / np.linalg.norm(tail))[:N]


def scene():
    """Stereo tool plus mono near sounds, their room answer and the background."""
    # soft, wet contacts carry no top treble
    contacts = filtered(ticks() + landings(), lambda hz: 1 / (1 + (hz / 11600) ** 24))
    near = spray() + contacts + strokes()
    return workshop() + rotary_tool() + near + amp(-12.5) * walls(near)


def record(dry):
    """Removes everything from the band limit up."""
    return filtered(dry, lambda hz: hz < TOP_HZ)


dry = scene()
out = record(dry)
digitize_waveform(out)
```